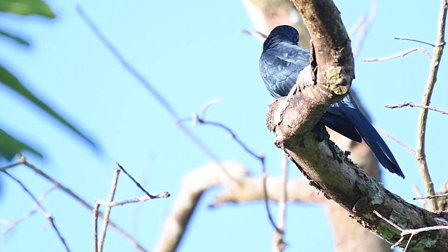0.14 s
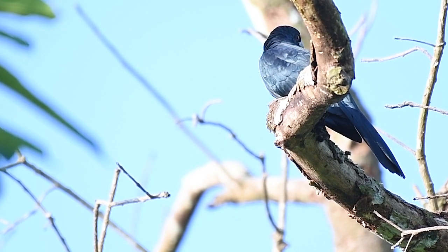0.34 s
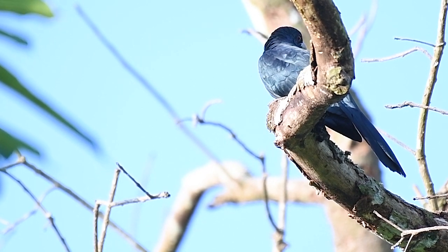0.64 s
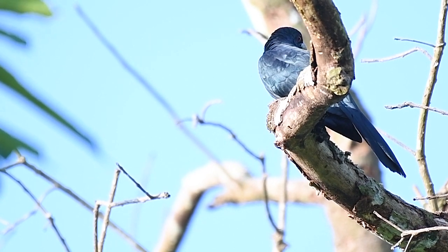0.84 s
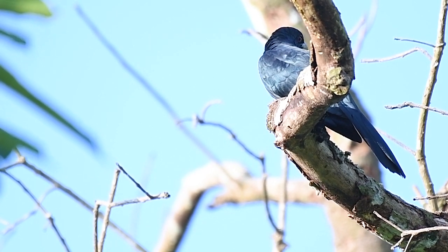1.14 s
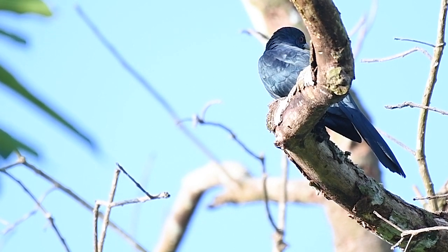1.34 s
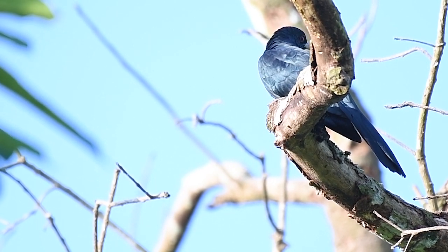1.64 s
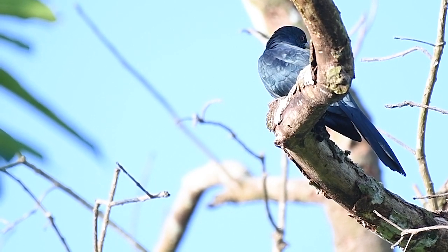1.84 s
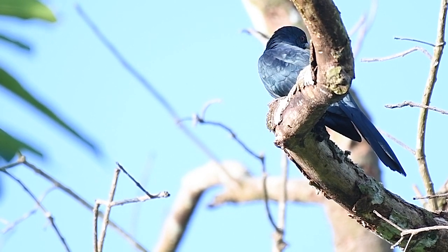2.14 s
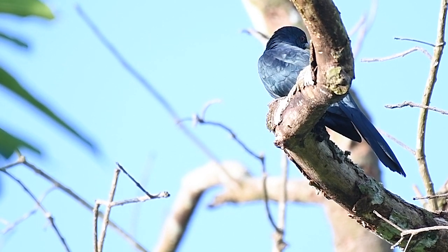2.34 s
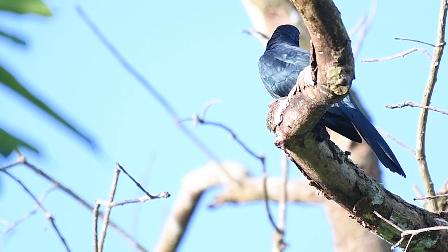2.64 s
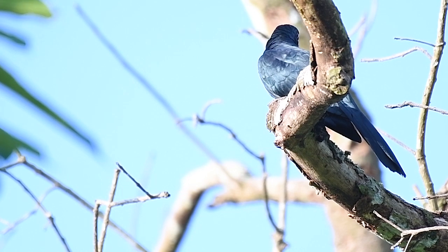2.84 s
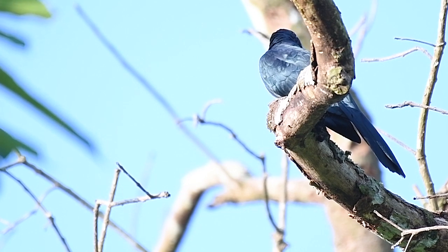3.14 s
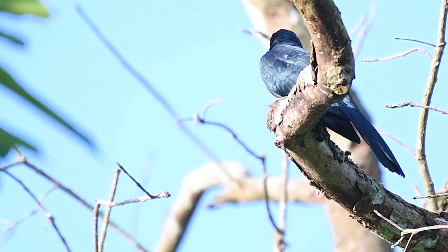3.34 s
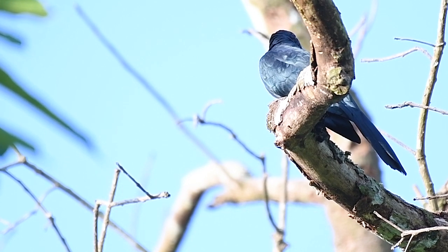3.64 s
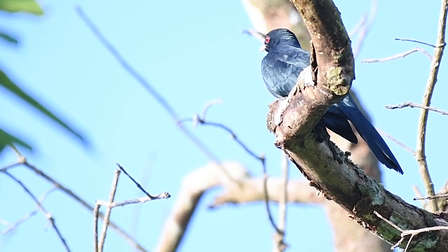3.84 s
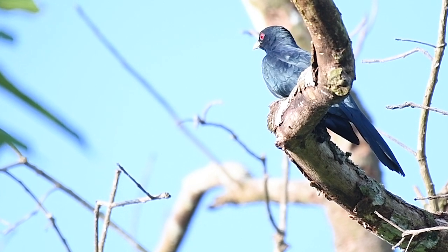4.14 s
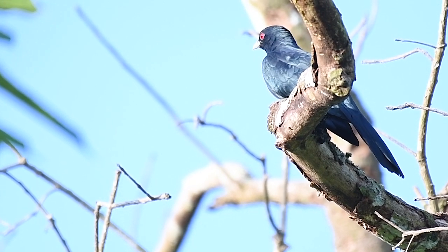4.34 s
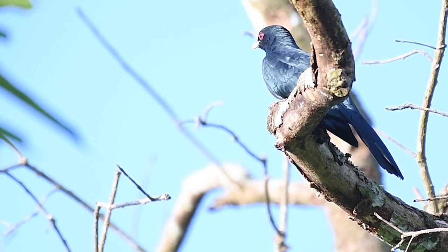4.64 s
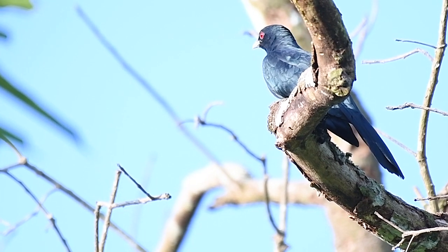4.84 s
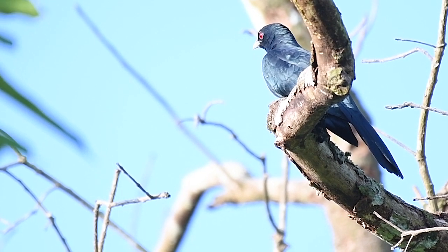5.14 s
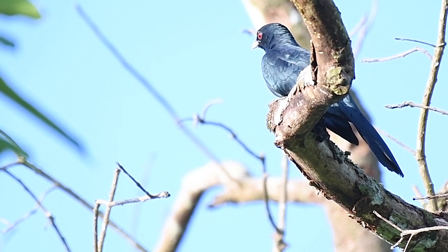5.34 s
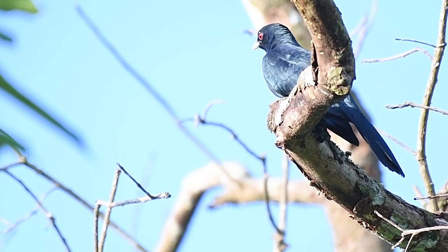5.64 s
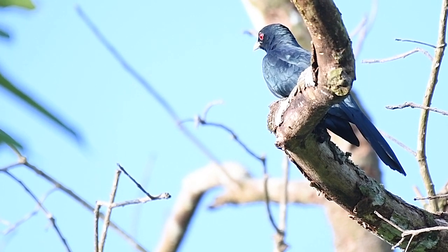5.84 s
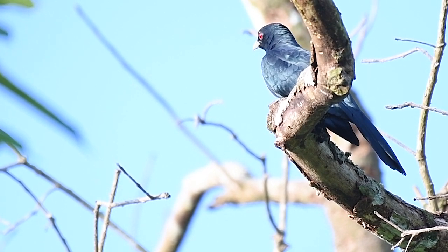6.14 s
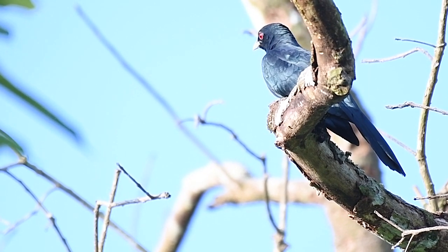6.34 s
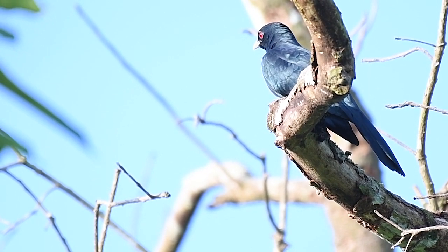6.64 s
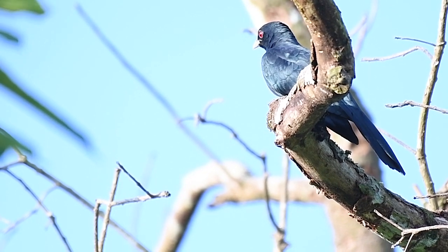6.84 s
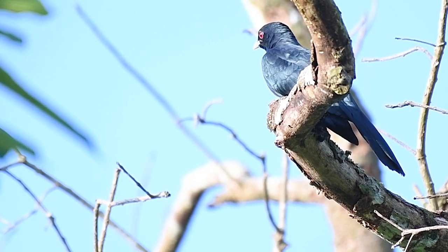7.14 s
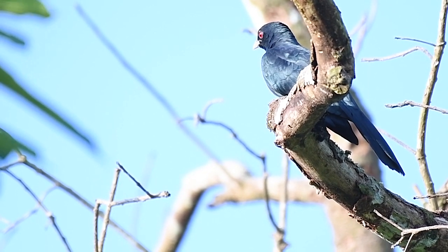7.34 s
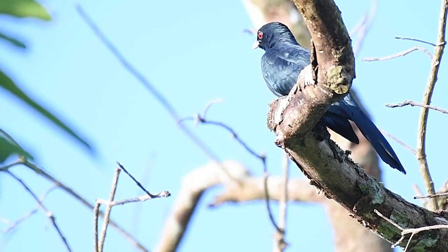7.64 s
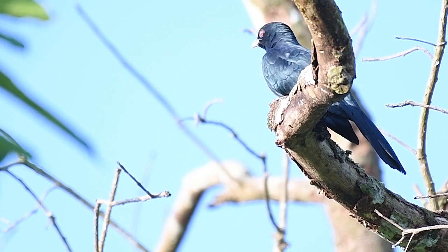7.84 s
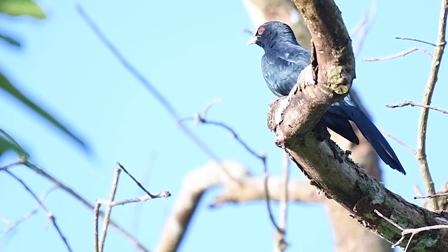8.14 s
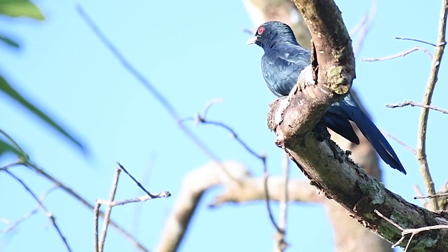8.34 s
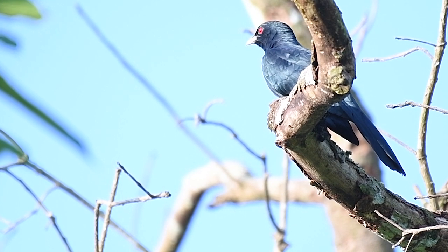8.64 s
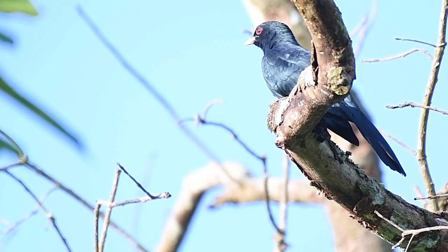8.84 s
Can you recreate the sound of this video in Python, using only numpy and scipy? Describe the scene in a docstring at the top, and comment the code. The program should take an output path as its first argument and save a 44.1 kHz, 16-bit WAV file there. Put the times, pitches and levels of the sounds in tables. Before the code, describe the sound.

A near bird gives sharp, loud chirps with woody echoes over a constant high cicada buzz, with faint far birds and a distant engine hum.

```python
"""A bird in forest branches gives loud chirps: a rising squeak, an arched whistle and a falling rasp,
each a harmonic stack with turbulence, shaped by a throat; filtered noise bursts tail off as tree echoes.
Other birds pip and twitter farther off as gliding tones, and a twig ticks once.
Cicadas buzz steadily as rings and noise at the stroke rate of their tymbals.
Engine orders hum faintly in the distance under the coloured noise of the open forest."""
import sys
import numpy as np
from scipy import signal
from scipy.fft import rfft, irfft, next_fast_len
from scipy.io import wavfile
from scipy.ndimage import uniform_filter1d, map_coordinates

SR = 44100
rng = np.random.default_rng(int(sys.argv[2]) if len(sys.argv) > 2 else 0)


def unload_audio(sound):
    """Save the sound as a 16-bit wav file, at the path given as the first command line argument."""
    columns = np.transpose(np.atleast_2d(sound))
    # keep every value between -1 and 1, then stretch to whole-number steps
    steps = np.round(np.clip(columns, -1, 1) * 32767)
    wavfile.write(sys.argv[1], SR, steps.astype(np.int16))


N = 396459
TIME = np.arange(N) / SR
EDGE_HZ = 15550  # upper band limit

# throat and beak response: freq_hz, gain_db
THROAT_RESPONSE = [(1000, -20), (1700, -13.5), (2300, -8.5), (3100, -5), (4500, 0.5), (5600, -1),
                   (7000, -13), (8200, -10), (9000, -11.5), (10500, -20), (11700, -29.5), (12500, -45),
                   (14200, -48), (15500, -58)]
# some chirps leap to a higher register; in the last row the whistle only cuts out:
# start_s, length_s, top_hz, level_db (before near_bird's gains), left_right_db
REGISTER_LEAPS = [(2.337, 0.04, 5420, -20.5, -3), (4.126, 0.02, 4670, -30, 2),
                  (4.329, 0.032, 4450, -63, 10)]
# whistle and leap level at start, middle, end
WHISTLE_SHAPE_DB = (-6, -1.5, -7)


def near_bird(direct_db=0.5, wet_db=0.5):
    """The near chirps, heard directly and off the trees, where moving leaves blur their pitch."""
    # two birds overlap briefly; levels are before the direct and wet gains:
    # whistle_start_s, time_to_top_s, whistle_s, fall_s, top_hz, fall_start_hz, fall_end_hz,
    # squeak_db, whistle_db, fall_db, high_overtones_db, whistle_left_right_db, fall_left_right_db, scratch_db
    chirp_rows = [(2.332, 0.014, 0.077, 0.02, 4214, 2575, 1900, -44, -25, -27, -8.5, 2, 2, -35),
                  (2.529, 0.0116, 0.067, 0.049, 3897, 2505, 1560, -45.5, -25, -27.5, -11, 2, -3.5, -65),
                  (2.77, 0.0164, 0.052, 0.052, 3578, 2430, 1615, -44, -24.5, -28.5, -11, 0, -3, -65),
                  (3.347, 0.028, 0.092, 0.021, 3580, 2195, 1506, -45, -34.5, -37, -5.5, -1, 7, -53),
                  (3.6, 0.021, .056, 0.036, 3510, 2270, 1580, -47, -39, -37, -11.5, 1, -1, -52),
                  (4.104, 0.028, 0.065, 0.055, 3990, 2366, 1957, -44, -29.5, -32, -11.5, 3, 1, -50),
                  (4.171, 0.0034, 0.054, 0.031, 3440, 2330, 1770, -45, -40, -47, -18, -5, -2, -61),
                  (4.32, 0.023, 0.063, 0.073, 3977, 2437, 1397, -53, -29, -39.5, -16.5, 12, 16, -67),
                  (4.417, 0.017, .060, .031, 3520, 2340, 1618, -41, -39.5, -37.5, -6.5, 14, 10, -57),
                  (5.005, 0.027, 0.069, .063, 3510, 2310, 1563, -46.5, -39.5, -36.5, -28, -2, -1, -62),
                  (5.381, 0.026, 0.054, 0.067, 3513, 2377, 1660, -43, -34.5, -35.5, -11, 8, 9, -51),
                  (6.189, 0.023, 0.056, 0.044, 3523, 2420, 1470, -38, -36, -36, 2, 22, 7, -52),
                  (6.423, 0.0174, .046, .049, 3530, 2370, 1503, -44.5, -34, -34.5, -4, 5, 4, -46),
                  (6.661, 0.013, 0.048, 0.045, 3530, 2324, 1460, -41, -37.5, -36.5, 2, 17, 0, -43.5),
                  (6.917, 0.02, .052, 0.04, 3380, 2270, 1495, -41, -40.5, -40, -2.5, 20, -5.5, -56),
                  (7.374, 0.022, 0.049, 0.067, 3365, 2305, 1280, -48.5, -41, -39.5, -4.5, 17, -5.5, -57),
                  (7.701, 0.022, 0.061, 0.073, 3340, 2275, 1400, -67, -58, -55, -15, 2, 2.5, -71),
                  (8.231, 0.017, 0.059, 0.076, 3290, 2165, 1180, -55, -45, -42.5, -9.5, 8, 1.5, -60)]
    # the bird turns and the forest's answer changes: time_s, right_delay_s, echo_db (before the wet gain)
    path = [(2.3, -.00002, -7.5), (2.9, -.00002, -9), (4.2, .00002, -2), (5.1, .00005, -2),
            (5.4, .0002, -2), (6.2, .00023, -2), (7.4, .00025, -1.5), (8.3, .00025, -5)]
    scratch_lead_s = 0.019  # before the whistle
    echo_sway, echo_sway_hz = .012, 260.4  # pitch blur in the echoes: share, speed

    direct, call = np.zeros((2, N)), np.zeros(N)
    delay_s, echo_db = curves(path)
    gestures = [part for *row, _ in chirp_rows for part in chirp(*row)]
    gestures += [leap(*row) for row in REGISTER_LEAPS]
    gestures.append(slur())
    for start, pan_db, *gesture in gestures:
        left, right = note(*gesture) * sides(pan_db)
        add(direct[0], start, left)
        add(direct[1], start + delay_s[round(start * SR)], right)
        blurred = note(*gesture, jitter=echo_sway, jitter_hz=echo_sway_hz, flutter_db=3.5, rasp_db=-15)
        add(call, start, blurred)
    for start, *_, scratch_db in chirp_rows:
        sound = gain_of(scratch_db) * scratch()
        add(call, start - scratch_lead_s, sound)
        add(direct, start - scratch_lead_s, sound * sides(0))
    echoes = leafy(call * gain_of(echo_db))
    return gain_of(direct_db) * direct + gain_of(wet_db) * echoes


def chirp(start, top_s, whistle_s, fall_s, top_hz, fall_hz, end_hz,
          squeak_db, whistle_db, fall_db, overtones_db, whistle_pan_db, fall_pan_db):
    """Three syrinx gestures, each as (start, left-right, pitch, level, envelope, overtones)."""
    squeak_s, squeak_from_hz, squeak_to_hz = .022, 1000, 2513
    climb_s, climb = .025, .12  # climb_s before its top, the whistle is this share flat
    sag, sag_power = .2, 1.55  # after its top it sinks by this share
    fall_steady, fall_power = .5, 3.5  # share of steady slide; the rest plunges at the end
    squeak_shape_db, fall_shape_db = (-4, 0, -2.5), (-1, -1.5, -3.5)  # at start, middle, end

    u = progress(squeak_s)
    pitch = squeak_from_hz + (squeak_to_hz - squeak_from_hz) * u
    envelope = gain_of(arch(squeak_shape_db, len(u)))
    squeak = start - squeak_s, 0, pitch, squeak_db, envelope, overtones_db

    t = progress(whistle_s) * whistle_s
    before = np.maximum(top_s - t, 0) / climb_s
    after = np.maximum(t - top_s, 0) / (whistle_s - top_s)
    pitch = top_hz * (1 - climb * before ** 2 - sag * after ** sag_power)
    # the whistle is silent during a leap or a short gap
    silent = sum((start + t > s) & (start + t < s + length) for s, length, *_ in REGISTER_LEAPS)
    envelope = gain_of(arch(WHISTLE_SHAPE_DB, len(t))) * uniform_filter1d(1. - silent, size=80)
    whistle = start, whistle_pan_db, pitch, whistle_db, envelope, overtones_db

    u = progress(fall_s)
    slide = fall_steady * u + (1 - fall_steady) * u ** fall_power
    pitch = fall_hz + (end_hz - fall_hz) * slide
    envelope = gain_of(arch(fall_shape_db, len(u)))
    fall = start + whistle_s, fall_pan_db, pitch, fall_db, envelope, overtones_db
    return [squeak, whistle, fall]


def leap(start, length, top_hz, db, pan_db):
    """A short, nearly pure arch in place of the whistle, too faint to hear in the last row."""
    top_s, sag_per_s2, overtones_db = 0.0136, 179, -17.5
    t = progress(length) * length
    pitch = top_hz * (1 - sag_per_s2 * (t - top_s) ** 2)
    return start, pan_db, pitch, db, gain_of(arch(WHISTLE_SHAPE_DB, len(t))), overtones_db


def slur():
    """One long gesture in the low register that lifts and slides down."""
    # time_s, pitch_hz, level_db (before near_bird's gains)
    slur_rows = [(5.706, 1714, -49.5), (5.723, 2213, -45), (5.74, 2362, -39.5), (5.752, 2056, -38.5),
                 (5.783, 2027, -39), (5.822, 1758, -38.5), (5.859, 1480, -51)]
    overtones_db, pan_db = -10.5, 6
    s, hz, db = np.transpose(slur_rows)
    t = np.arange(s[0], s[-1], 1 / SR)
    envelope = gain_of(np.interp(t, s, db) - db.max())
    return s[0], pan_db, np.interp(t, s, hz), db.max(), envelope, overtones_db


def note(pitch, db, envelope, overtones_db, jitter=0.0074, jitter_hz=170, flutter_db=2.5, flutter_hz=110,
         edge=0.0014, rasp_db=-27, overtone_db=-1, pressed=0.68):
    """One gesture of the syrinx: a gliding stack of harmonics through the throat, with a little turbulence."""
    size = len(pitch)
    pitch = pitch * (1 + jitter * drift(size, jitter_hz))
    k = np.arange(1, 10)[:, None]
    hz = k * pitch
    height = gain_of(read(THROAT_RESPONSE, hz)) * (hz < EDGE_HZ)
    # the harder the bird pushes, the weaker its low fundamental is against the throat's main band
    push_db = np.clip(db + 40, -6, 12)
    height *= gain_of(-pressed * push_db * np.clip((2900 - hz) / 400, 0, 1))
    height /= np.sqrt((height ** 2).sum(0) + 0.026)
    # a wider beak lets more of the high overtones out
    high = np.clip((hz - 6500) / 2000, 0, 1)
    plain_db = 10 * np.log10(((height * high) ** 2).sum(0).mean() + 1e-6)
    height = height * gain_of(high * np.clip(overtones_db + overtone_db - plain_db, -12, 10))
    phase = 2 * np.pi * np.cumsum(pitch) / SR
    voice = evened((height * np.sin(k * phase)).sum(0))
    # turbulence pulses once a cycle
    rasp = evened(colour(rng.standard_normal(size) * (1 + np.cos(phase)), hiss_colour))
    level = envelope * gain_of(db + flutter_db * drift(size, flutter_hz))
    return (voice + gain_of(rasp_db) * rasp) * level * fade(size, edge)


def scratch(length=.02, start_rate_hz=520, rough=1.0):
    """The syrinx starts with uneven pulses, doubling in rate, and noise through the throat."""
    size = round(length * SR)
    rate_hz = start_rate_hz * np.linspace(1, 2, size) * (1 + 0.09 * drift(size, 400))
    turns = np.cumsum(rate_hz) / SR
    pulses = np.diff(np.floor(turns), prepend=0)
    drive = evened(pulses) + rough * rng.standard_normal(size)
    return evened(colour(drive, hiss_colour)) * fade(size, 0.0014)


def hiss_colour(hz, low_hz=2700):
    """Turbulence takes the throat's colour but has little of its low end."""
    return gain_of(read(THROAT_RESPONSE, hz)) * hz ** 3 / (hz ** 3 + low_hz ** 3)


def far_birds(direct_db=-5, wet_db=-1, rasp_waver_hz=600):
    """Whistles, hoarse pulses and a wail, gliding tones blurred by the trees."""
    # all levels are before the direct and wet gains
    # start_s, length_s, start_hz, end_hz, level_db
    whistle_rows = [(0.091, .07, 1695, 1850, -62), (0.144, .04, 2260, 2150, -58),
                    (.198, 0.048, 1750, 2430, -59), (.245, 0.026, 1840, 2050, -60),
                    (0.222, 0.14, 4140, 3660, -59), (.262, .03, 4800, 4550, -54),
                    (.34, .045, 4820, 4100, -51), (0.352, 0.067, 5900, 5400, -52),
                    (1.46, 0.047, 4350, 4000, -66), (1.522, 0.17, 3610, 3140, -63.5),
                    (1.549, 0.086, 5690, 4900, -56), (3.676, 0.47, 2087, 2033, -67),
                    (4.721, 0.1, 4610, 3700, -58.5), (4.714, .09, 2196, 1620, -63),
                    (5.973, 0.023, 3370, 4830, -53.5), (5.991, .03, 4790, 4260, -52),
                    (6.106, 0.032, 4950, 5370, -53), (8.58, 0.027, 1990, 1500, -61),
                    (8.59, 0.062, 1580, 1430, -65), (8.712, .025, 1940, 2350, -62.5),
                    (8.792, 0.043, 1526, 1640, -64), (8.862, 0.038, 1890, 1280, -63)]
    # high, hoarse pulses: start_s, level_db
    rasp_rows = [(1.96, -48), (2.003, -43), (2.09, -45.5), (2.133, -42), (2.22, -49), (2.265, -43)]
    # a low wail sinks three times over: start_s, length_s, level_db
    wail_rows = [(8.25, .31, -62), (8.42, 0.37, -68), (8.519, .4, -65.5)]
    whistle_waver = 0.019
    rasp_s, rasp_from_hz, rasp_to_hz, rasp_waver = 0.035, 6970, 5690, .1
    wail_from_hz, wail_to_hz, wail_droop_hz_per_s, wail_waver = 795, 690, 230, 0.02

    out = np.zeros(N)
    for start, length, from_hz, to_hz, db in whistle_rows:
        add(out, start, gain_of(db) * glide(length, from_hz, to_hz, whistle_waver))
    for start, db in rasp_rows:
        add(out, start, gain_of(db) * glide(rasp_s, rasp_from_hz, rasp_to_hz, rasp_waver, rasp_waver_hz))
    for start, length, db in wail_rows:
        droop_hz = wail_droop_hz_per_s * (start - wail_rows[0][0])
        wail = glide(length, wail_from_hz - droop_hz, wail_to_hz - droop_hz, wail_waver, broken_db=1)
        add(out, start, gain_of(db) * wail)
    return gain_of(direct_db) * out + gain_of(wet_db) * leafy(out)


def glide(length, from_hz, to_hz, waver, waver_hz=130, edge=0.01, broken_db=2.5, broken_hz=45):
    """A wavering, broken tone that moves slowly off its pitch, then slides away faster."""
    u = progress(length)
    hz = (from_hz + (to_hz - from_hz) * u ** 1.6) * (1 + waver * drift(len(u), waver_hz))
    level = gain_of(broken_db * drift(len(u), broken_hz)) * fade(len(u), edge)
    return evened(np.sin(2 * np.pi * np.cumsum(hz) / SR) * level)


def pips(pip_hz=800, rise_s=0.0036, trim_db=2, wet_db=-6):
    """A far bird's short hollow notes, three a second: sines with a quick rise and decay."""
    # start_s, peak_db (before trim_db and the left-right gains)
    pip_rows = [(0.08, -51.5), (0.412, -51.5), (0.738, -51), (1.072, -49.5), (1.399, -48.5), (1.722, -47.5),
                (4.76, -49.5), (5.124, -56), (5.487, -48.5), (5.826, -47), (6.163, -49.5)]
    t, out = np.arange(2000) / SR, np.zeros(N)
    pip = t / rise_s * np.exp(1 - t / rise_s) * np.sin(2 * np.pi * pip_hz * t)
    for s, db in pip_rows:
        add(out, s, gain_of(db + trim_db) * pip)
    return out * sides(-6.0) + gain_of(wet_db) * forest(out)


def twig(start_s=.146, level_db=-47, centre_hz=4200, decay_s=0.0026):
    """One small dry tick in the branches: a decaying burst of band-limited noise."""
    t, out = np.arange(1000) / SR, np.zeros(N)
    noise = rng.standard_normal(len(t))
    tick = evened(colour(noise, lambda f: 1 / (1 + ((f - centre_hz) / 1300) ** 4)))
    add(out, start_s, gain_of(level_db) * tick * np.exp(-t / decay_s))
    return out + gain_of(-2) * forest(out)


def cicadas(second_db=-5, chorus_db=-3, swell_db=0.77, shared=0.16):
    """One steady insect, one wavering, and the blur of many more, all filtered to the same spectrum."""
    # spectrum of the buzz: bands near 6.4 and 9.3 kHz, with a filtered-out dip near 7.7 kHz:
    # freq_hz, relative_db
    buzz_spectrum = [(4800, -57), (5500, -20.5), (6000, -11.5), (6250, -1), (6430, 3.5), (6750, -0.5),
                     (7000, -1), (7350, -27), (7700, -54), (8100, -47), (8400, -22), (9250, -8),
                     (9700, -13.5), (10500, -38), (11500, -46), (13000, -34), (14500, -54)]
    # freq_hz, left_right_db
    buzz_sides = [(5800, -8), (6600, 0.5), (7500, -22), (8400, 13), (9200, 7), (10500, 26), (13000, 5)]
    # time_s, level_db (before the swell)
    buzz_level = [(0, -41), (1, -41), (2, -41.5), (3, -41), (4, -41.5), (5, -42), (6, -42), (7, -41),
                  (8, -41.5), (9, -41)]
    steady = tymbals(74.45, .001, .42) * sides(2)
    wavering = gain_of(second_db) * tymbals(76, .05, 1.0)
    chorus = gain_of(chorus_db) * rng.standard_normal((2, N))
    drive = steady + wavering + chorus
    drive = drive + shared / 2 * drive[::-1]  # each side leaks into the other
    buzz = colour(drive, lambda f: gain_of(read(buzz_spectrum, f)) * sides(read(buzz_sides, f)))
    return evened(buzz) * gain_of(curves(buzz_level)[0] + swell_db * drift(N, 4))


def tymbals(rate_hz, wander, weak, centre_hz=6550, glide_hz=380, crackle=0.68):
    """Two tymbals buckle in turn, strong and weak by a set ratio: each stroke a rising ring and rib crackle."""
    turns = 2 * np.cumsum(rate_hz * (1 + wander * drift(N, 1.5))) / SR
    stroke, age = turns.astype(int), turns % 1
    size = np.where(stroke % 2, weak, 1) * np.sin(np.pi * age)
    start_turn = rng.random((2, 4096))[:, stroke]  # each stroke starts at a random phase
    ring_hz = centre_hz + glide_hz * (2 * age - 1)
    ring = np.sin(2 * np.pi * (start_turn + np.cumsum(ring_hz) / SR))
    return size * (ring / 2 + crackle * rng.standard_normal((2, N)))


def engines(level_db=0, upper_gain_db=-1, rev_db=-3, whine_hz=525, waver_db=2, fading_db=1.5):
    """Only the low orders of far engines carry through the trees, each fading in and out on its way."""
    # levels are before the gains, fading and waver given above
    # hum: time_s, second_order_hz, second_order_db
    hum_rows = [(0.0, 85.3, -68), (0.18, 85.3, -63.5), (1.01, 85.5, -61), (1.09, 86.6, -67),
                (1.89, 88.6, -68), (2.0, 85.3, -82), (2.21, 88.1, -65), (3.28, 88.2, -60),
                (4.16, 88.2, -65), (4.22, 87.0, -81), (4.37, 91.5, -71), (4.53, 86.1, -72),
                (5.4, 86.8, -50), (6.8, 86.7, -65), (7.3, 87.0, -65), (7.4, 92.1, -74)]
    # time_s, third_order_db; the higher orders follow it
    third_rows = [(0.0, -75), (0.91, -79), (1.01, -68.5), (3.67, -66.5), (4.39, -74.5), (5.05, -60.5),
                  (6.92, -62), (7.4, -71)]
    # order, level_db (relative to the third)
    upper_orders = [(4, -10), (5, -16.5), (6, -10.5), (7, -11), (8, -38.5), (9, -11.5)]
    # a second engine revs and drops back: time_s, rate_hz, second_order_db, third_and_fourth_order_db
    rev_rows = [(6, 26.85, -88, -82), (6.5, 31.24, -75, -81), (7.3, 38.36, -69, -72),
                (7.42, 53.6, -64, -66), (7.7, 39.9, -67, -67), (8.2, 28.55, -97, -67.5),
                (8.5, 25.9, -95, -92.5)]
    # a faint whine comes and goes: loudest_s, half_length_s (to half amplitude), level_db
    whine_rows = [(0.746, 0.13, -70.5), (1.8, 1, -74), (7.352, 0.096, -62.5), (7.814, 0.2, -69.5),
                  (8.75, 0.3, -66.5)]
    stop_s, fade_s = 7.5, 0.25

    hum_hz, second_db = curves(hum_rows)
    third_db = curves(third_rows)[0] + upper_gain_db
    phase = np.pi * np.cumsum(hum_hz) / SR  # first order
    hum = gain_of(second_db + fading_db * drift(N, 7.4)) * np.sin(2 * phase)
    for order, db in [(3, 0)] + upper_orders:
        level = gain_of(third_db + db + waver_db * drift(N, 3))
        hum += level * np.sin(round(order) * phase + 0.91 * drift(N, 3.9))
    hum *= np.clip((stop_s - TIME) / fade_s, 0, 1)

    rate_hz, second_db, upper_db = curves(rev_rows)
    phase = 2 * np.pi * np.cumsum(rate_hz * (1 + 0.017 * drift(N, 15))) / SR
    rev = gain_of(second_db) * np.sin(2 * phase)
    rev += gain_of(upper_db) * (np.sin(3 * phase) + np.sin(4 * phase))
    rev *= (TIME > rev_rows[0][0]) * (TIME < rev_rows[-1][0])

    swells = sum(gain_of(db) / (1 + ((TIME - s) / width) ** 2) for s, width, db in whine_rows)
    whine = swells * np.sin(2 * np.pi * whine_hz * TIME + drift(N, 7))
    return np.sqrt(2) * (gain_of(level_db) * hum + gain_of(rev_db) * rev + whine)


def air(level_db=-56.5, roar_share=1.0, roar_hz=1100):
    """Forest hiss, coloured noise, with a filtered-out dip near 7.8 kHz; its low part swells with far traffic."""
    # freq_hz, relative_db_per_hz
    air_spectrum = [(20, -14), (50, -12), (90, 1.5), (150, -2.5), (300, -2.5), (650, -2.5), (1000, -4),
                    (2000, -7.5), (3200, -10), (5500, -9.5), (7200, -6), (7800, -64), (8600, -1.5),
                    (11000, -21), (14000, -23.5), (15500, -30)]
    # freq_hz, left_right_likeness
    likeness = [(180, 1), (300, .98), (640, .76), (1400, 0), (3000, -.1), (15000, 0)]
    # far traffic: time_s, roar_db (only its departure from the median counts)
    roar_rows = [(0.0, -65), (0.47, -67.5), (2.03, -64.5), (2.05, -66.5), (4.78, -64.5), (6.26, -61),
                 (6.86, -67), (7.24, -62.5), (7.29, -66), (8.99, -68.5)]
    a, b = rng.standard_normal((2, N))
    same = lambda f: np.clip(read(likeness, f), -1, 1)
    right = colour(a, same) + colour(b, lambda f: np.sqrt(1 - same(f) ** 2))
    hiss = evened(colour(np.array([a, right]), lambda f: gain_of(read(air_spectrum, f))))
    low = colour(hiss, lambda f: 1 / (1 + (f / roar_hz) ** 4))
    roar_db = curves(roar_rows)[0]
    swell = gain_of(roar_share * (roar_db - np.median(roar_db)))
    return gain_of(level_db) * (hiss + low * (swell - 1))


def forest(x, onset_s=0.0013, near_db=3, near_s=0.017):
    """Trunks and leaves scatter the sound: strong early echoes, then a tail whose treble dies first."""
    # freq_hz, t60_s
    decay = [(500, 0.97), (2000, 0.79), (4000, 0.76), (7000, 0.7), (10000, 0.47), (15000, .25)]
    taps = rng.standard_normal((2, SR)) * (rng.random((2, SR)) < 2500 / SR)  # 2500 echoes a second
    t = np.arange(SR) / SR
    taps *= (1 - np.exp(-t / onset_s)) * (1 + gain_of(near_db) * np.exp(-t / near_s))
    hz, at, z = signal.stft(taps, SR, nperseg=256)
    z = z * gain_of(-60 * at / read(decay, hz)[:, None])
    tail = signal.istft(z, SR, nperseg=256)[1]
    voice_band = abs(rfft(tail, SR))[:, 3000:5000]  # 1 Hz bins; unit gain here
    return signal.fftconvolve(x[None], tail / np.sqrt(np.mean(voice_band ** 2)), axes=1)[:, :N]


def leafy(x, turn_hz=45, count=3):
    """Leaves keep moving, so the sound passes in turn through several sets of echoes."""
    turns = [np.sin(np.pi * (turn_hz * TIME + k / count)) * np.sqrt(2 / count) for k in range(count)]
    return sum(forest(x * turn) for turn in turns)


def gain_of(db):
    """Decibels to amplitude."""
    return 10 ** (np.asarray(db) / 20)


def evened(x):
    """Scales to rms 1."""
    return x / np.sqrt(np.mean(x ** 2) + 1e-20)


def read(points, hz):
    """A spectrum's value at hz, on a log-frequency axis."""
    f, value = np.transpose(points)
    return np.interp(np.log(hz + 1), np.log(f + 1), value)


def curves(rows):
    """Each column of a time table at every sample."""
    s, *columns = np.transpose(rows)
    return [np.interp(TIME, s, c) for c in columns]


def add(mix, s, sound):
    """Mixes a sound in at time s."""
    part = mix[..., round(s * SR):][..., :sound.shape[-1]]
    part += sound[..., :part.shape[-1]]


def colour(x, gain):
    """Filters x by a function of frequency."""
    size = next_fast_len(x.shape[-1] + 2048)
    spectrum = rfft(x, size) * gain(np.fft.rfftfreq(size, 1 / SR))
    return irfft(spectrum, size)[..., :x.shape[-1]]


def drift(size, hz):
    """Smooth chance of rms near 1 that moves up to hz times a second."""
    knots = rng.standard_normal(4096)
    return map_coordinates(knots, [np.arange(size) * 2 * hz / SR], order=2, mode="wrap")


def sides(db):
    """Left and right gains for a level difference."""
    pair = gain_of(np.array([np.atleast_1d(db), -np.atleast_1d(db)]) / 2)
    return pair / np.sqrt((pair ** 2).mean(0))


def arch(values, size):
    """A smooth arc through a start, middle and end value."""
    return np.polyval(np.polyfit([0, .5, 1], values, 2), np.linspace(0, 1, size))


def fade(size, edge):
    """Soft start and stop, edge seconds long."""
    return signal.windows.tukey(size, min(1, 2 * edge * SR / size))


def progress(length):
    """From 0 to 1 over length seconds."""
    return np.linspace(0, 1, round(length * SR))


def scene():
    """All the sources at the two microphones."""
    return near_bird() + far_birds() + pips() + twig() + cicadas() + engines() + air()


def record(dry):
    """Two deep notch filters and the band limit."""
    # centre_hz, half_width_hz (to a quarter of the amplitude)
    notch_rows = [(2610, 117), (7710, 148)]

    def notch_gain(f):
        """Product of the notches, each falling to zero at its centre."""
        dips = [((f - hz) ** 2 / ((f - hz) ** 2 + width ** 2)) ** 2 for hz, width in notch_rows]
        return np.prod(dips, axis=0)

    low_pass = signal.firwin(511, EDGE_HZ, window=("kaiser", 9), fs=SR)
    return signal.oaconvolve(colour(dry, notch_gain), low_pass[None], "same")


dry = scene()
out = record(dry)
unload_audio(out)
```